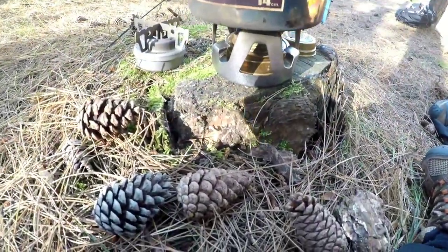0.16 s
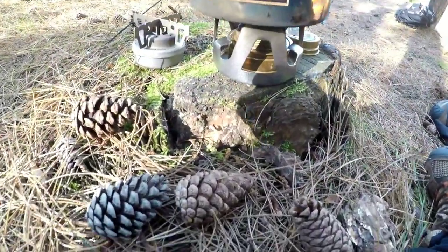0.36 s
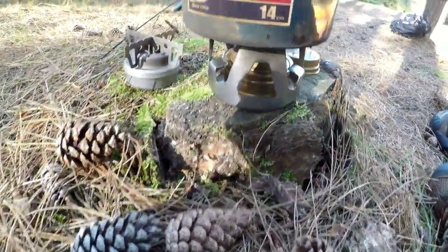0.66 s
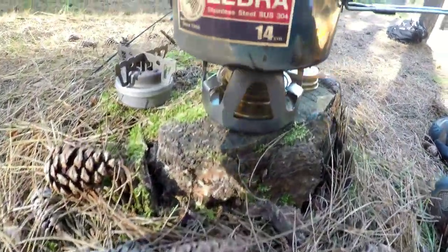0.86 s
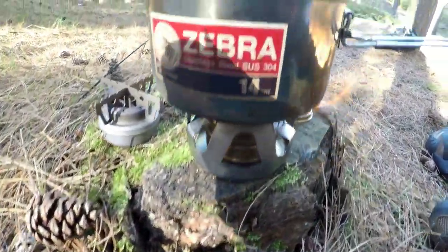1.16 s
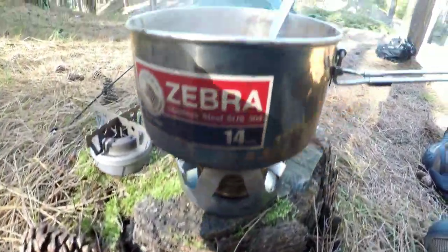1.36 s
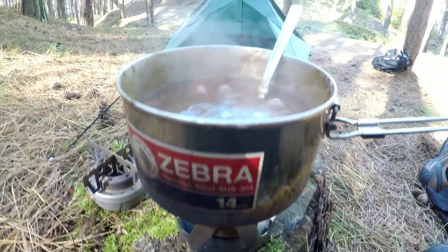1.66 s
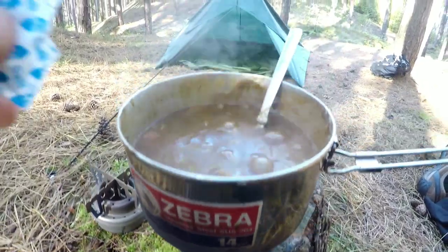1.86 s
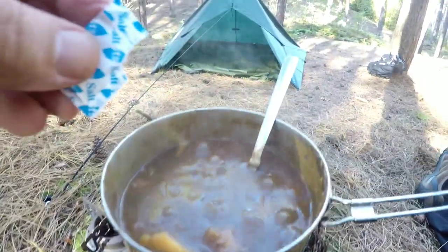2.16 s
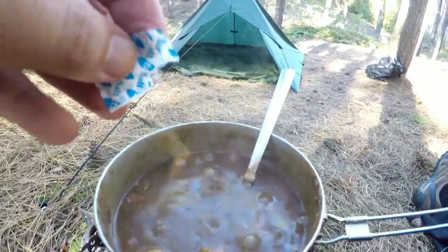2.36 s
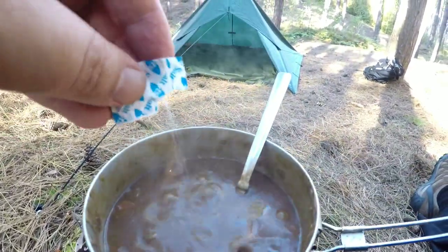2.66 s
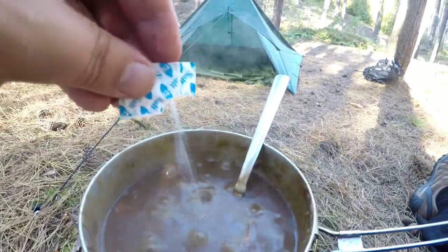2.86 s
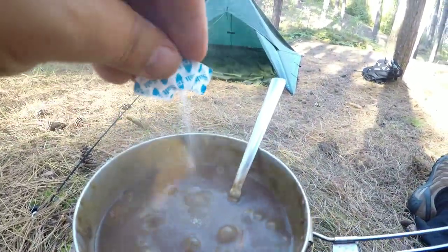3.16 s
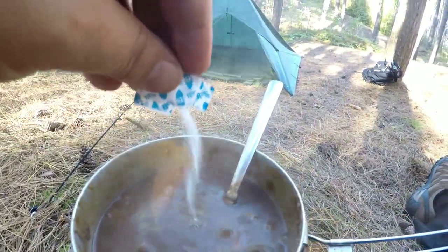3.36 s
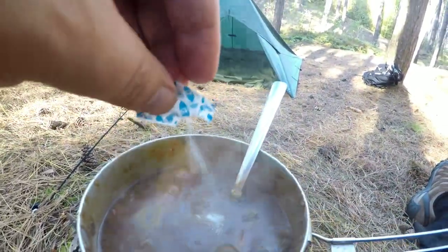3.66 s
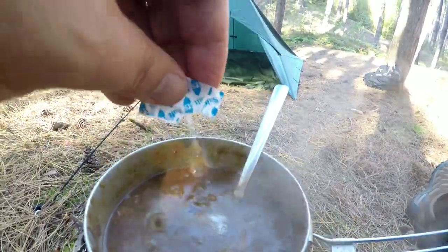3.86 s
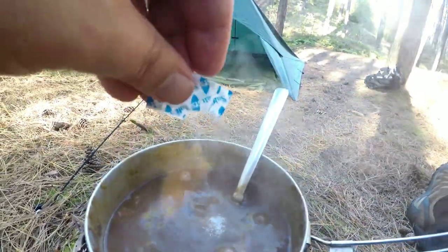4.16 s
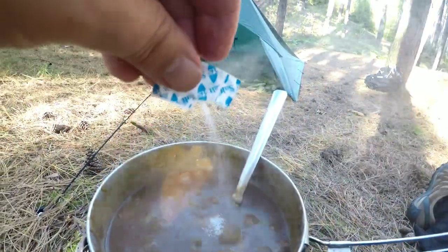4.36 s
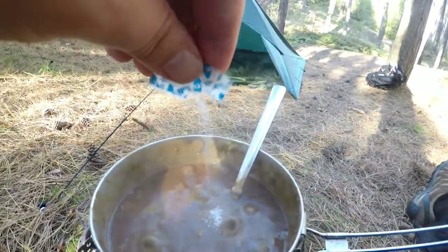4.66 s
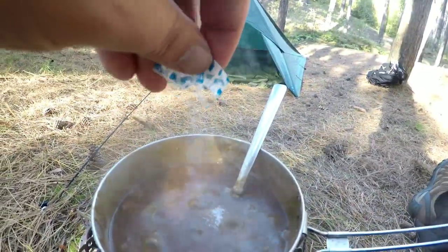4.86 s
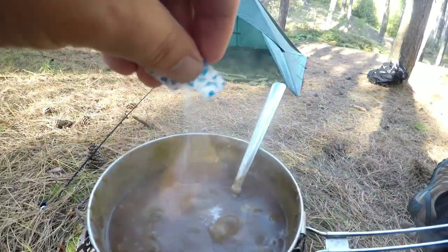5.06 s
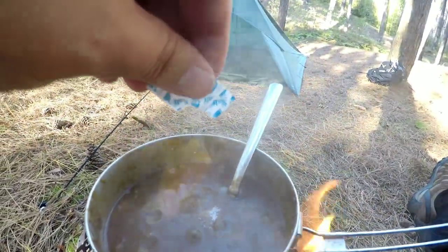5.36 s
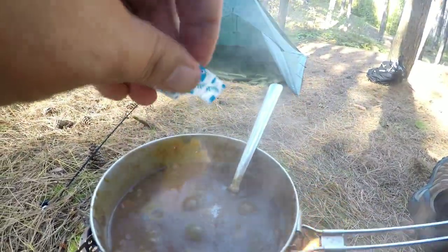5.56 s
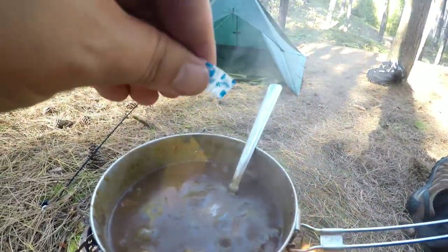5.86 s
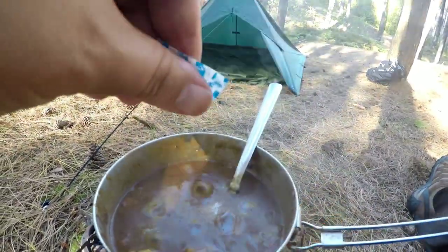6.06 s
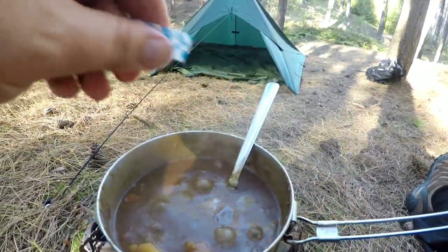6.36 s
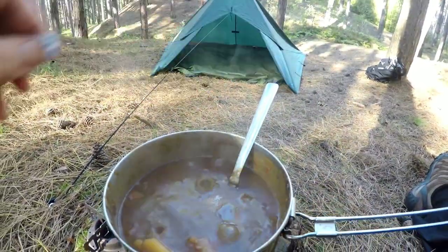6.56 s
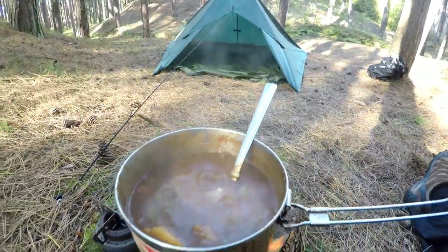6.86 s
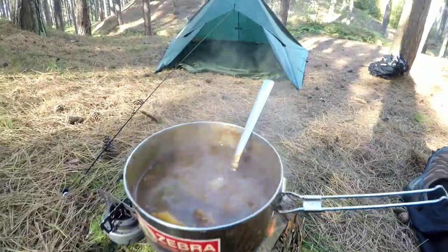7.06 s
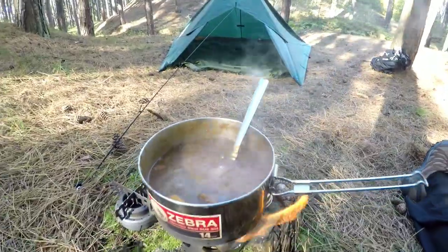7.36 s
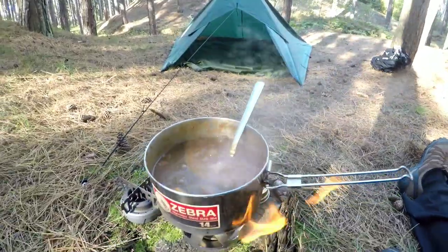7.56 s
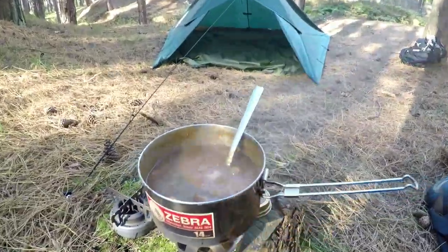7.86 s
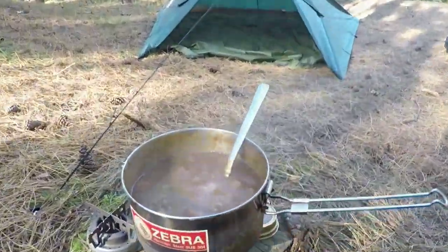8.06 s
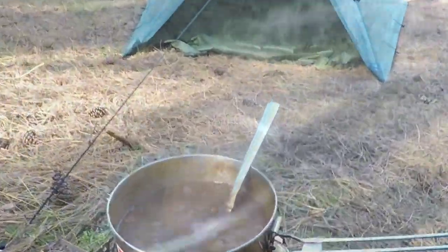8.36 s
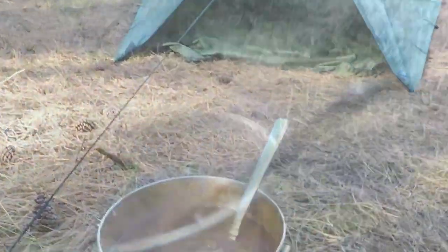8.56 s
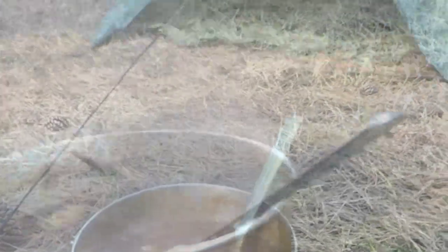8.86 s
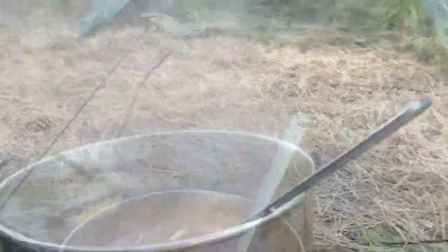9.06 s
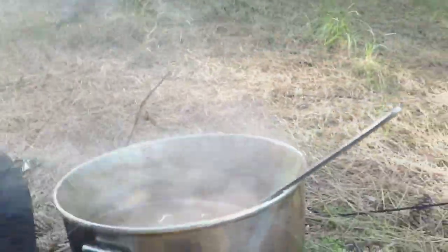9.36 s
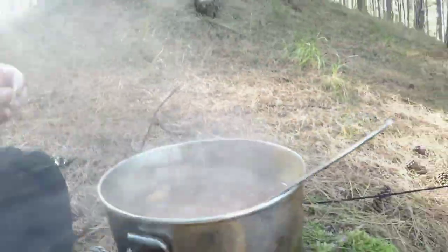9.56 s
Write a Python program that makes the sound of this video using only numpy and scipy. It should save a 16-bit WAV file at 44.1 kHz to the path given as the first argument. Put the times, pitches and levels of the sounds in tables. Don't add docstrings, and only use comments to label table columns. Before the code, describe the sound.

Outdoors, a hand-held microphone moves close to a pot of thick stew. Sparse, distant bubbling grows into dense plops, spits and fizz, while a paper sachet snaps and grains hiss out in several shakes. Low wind buffeting and hand knocks intrude, especially early and past seven seconds. After a tiny silence near the end, a calmer boil fades in and a puff of airy steam drifts past.

```python
import sys
import numpy as np
from scipy import signal
from scipy.fft import rfft, irfft, next_fast_len
from scipy.io import wavfile
from scipy.ndimage import uniform_filter1d, map_coordinates

SR = 44100
rng = np.random.default_rng(int(sys.argv[2]) if len(sys.argv) > 2 else 0)


def elevation(decibels):
    levels = np.asarray(decibels, float)
    return 10 ** (levels / 20)


def wrap_up_sound(samples):
    columns = np.atleast_2d(samples).T
    tamed = np.clip(columns, -1, 1)
    steps = np.round(tamed * 32767).astype(np.int16)
    wavfile.write(sys.argv[1], SR, steps)


N = 428211


def unit(x):
    return x / np.sqrt(np.mean(x ** 2) + 1e-20)


def curves(rows):
    s, *cols = np.transpose(rows)
    return [np.interp(np.arange(N) / SR, s, c) for c in cols]


def swells(rows):
    at, half, *rises = np.transpose(rows)
    coarse_t = np.arange(0, N, 64)[:, None] / SR
    humps = np.exp(-((coarse_t - at) / half) ** 2)
    return [np.repeat(humps @ rise, 64)[:N] for rise in rises]


def wobble(rate):
    knots = rng.standard_normal(int(N * rate / SR) + 4)
    return map_coordinates(knots, [np.arange(N) * rate / SR])


def coloured(x, points):
    m = next_fast_len(N + 8192)
    f, db = np.transpose(points)
    log_hz = np.log(np.fft.rfftfreq(m, 1 / SR) + 1)
    gain = elevation(np.interp(log_hz, np.log(f + 1), db))
    return unit(irfft(rfft(x, m) * gain, m)[:N])


def patchy():
    z = signal.stft(rng.standard_normal(N), nperseg=256)[2]
    across_hz = uniform_filter1d(rng.standard_normal(z.shape), 4, 0)
    field = uniform_filter1d(across_hz, 6, 1)
    return signal.istft(z * elevation(1.2 * unit(field)), nperseg=256)[1][:N]


def blips(s, db, hz, t60, rise, attack, size):
    t = np.arange(size) / SR
    s, db, hz, t60 = (np.asarray(v)[:, None] for v in (s, db, hz, t60))
    phase = 2 * np.pi * hz * t * (1 + rise * t / t60 / 2)
    onset = 1 - np.exp(-t * hz / attack)
    wave = elevation(db - 60 * t / t60) * onset * np.sin(phase)
    at = np.round(s * SR).astype(int) + np.arange(size)
    return np.bincount(at.ravel(), wave.ravel(), N + SR)[:N]


def clusters(s, db, hz, spread, smear, t60, count, size):
    g = rng.standard_normal((len(s), count, 3))
    fan = np.linspace(-1.4, 1.4, count) + .35 * g[..., 0]
    pitch = np.clip(hz[:, None] * np.exp(spread * fan), 500, 14500).ravel()
    level_db = (db[:, None] + 1.6 * g[..., 1] - 3.5 * fan ** 2).ravel()
    level_db = level_db - 4 * np.maximum(pitch / 1000 - 9, 0)
    late = smear * (1 + np.tanh(g[..., 2])) / 2
    return blips((s[:, None] + late).ravel(), level_db, pitch, t60 + 0 * pitch, rise=0.092, attack=1.5, size=size)


# [centre t/s, half length t/s, wind rise level/dB, hand rise level/dB]
GUSTS = [(.13, 0.019, 8, 5.5), (0.33, 0.098, 8, 0), (1.564, 0.0073, 13.5, 12), (1.705, 0.094, 7, 2),
         (2.315, 0.047, 8, 0.5), (2.791, 0.097, 11.5, -1), (3.212, 0.25, 8, -1), (3.455, 0.24, -1.5, 1.5),
         (7.183, 0.11, 12.5, 1.5), (7.41, 0.058, 11.5, 1.5), (7.746, 0.045, 11.5, 0),
         (8.59, 0.078, 10.5, -1.5), (8.667, 0.11, 6, 15)]
# [f/Hz, level/dB per Hz]
BUFFET = [(8, -5), (22, 2), (40, -2.5), (62, -4.5), (85, -23.5), (150, -30.5), (300, -120)]
# [f/Hz, level/dB per Hz]
HANDLING = [(30, -120), (55, -9), (80, 0), (130, -3.5), (220, -13), (310, -23.5), (400, -43), (900, -120)]
# [t/s, peak level/dB, f/Hz, t60 t/s]
KNOCKS = [(1.547, -11, 59.3, 0.092), (2.283, -27, 70, 0.056), (3.215, -6.5, 63.7, 0.074),
          (6.914, -25, 250.3, 0.052), (7.195, -11.5, 42.3, 0.12), (7.212, -21, 292, 0.016),
          (7.242, -25.5, 400, 0.0074), (7.3299, -1.5, 134, 0.014), (2.796, -16, 53.1, 0.15),
          (8.613, -4, 94, 0.12), (8.678, -14, 130, 0.029), (8.6849, -6.5, 199, 0.063)]


def rumble():
    wind_db, hand_db = swells(GUSTS)
    wind = elevation(1.75 * wobble(10)) * coloured(rng.standard_normal(N), BUFFET)
    grip = elevation(1.6 * wobble(25)) * coloured(rng.standard_normal(N), HANDLING)
    buffet = elevation(-31 + wind_db) * unit(wind)
    handling = elevation(-37 + hand_db) * unit(grip)
    s, db, hz, t60 = np.transpose(KNOCKS)
    knocks = blips(s, db + 0.5, hz, np.clip(t60, .01, .15), rise=0, attack=0.18, size=6000)
    return buffet + handling + knocks


# [start t/s, end t/s]
DROPOUT = (8.7995, 8.866)
# [centre t/s, half length t/s, rise level/dB]
STEAM = [
    (9.38, 0.38, 14.5),
]
# [f/Hz, level/dB per Hz]
PUFF = [(3000, -34), (5000, -14.5), (7000, -3.5), (8500, 11), (11000, 1), (13300, -7), (15400, -36)]
# [centre t/s, half length t/s, share of direct sound]
RIM = [
    (9.47, .14, .9),
]


def steam():
    lag_s = .00028
    hiss = coloured(patchy(), PUFF)
    echo = np.interp(np.arange(N) - lag_s * SR, np.arange(N), hiss)
    share = np.clip(swells(RIM)[0], 0, 1)
    later = np.arange(N) / SR > DROPOUT[0]
    return later * elevation(-72.5 + swells(STEAM)[0]) * (hiss + share * echo)


# [t/s, fizz level/dB]
BOIL = [(0.0, -58), (1.15, -55.5), (1.81, -55.5), (1.93, -56), (2.81, -58), (2.94, -54.5), (4.53, -58.5),
        (4.94, -55), (5.29, -60), (5.53, -55), (6.44, -59), (6.88, -58.5), (7.61, -54.5), (8.3, -60.5),
        (8.62, -60.5), (8.79, -58)]
# [centre t/s, half length t/s, rise level/dB]
POURS = [
    (1.9, 0.21, 3),
    (3.1, 0.47, 5.5),
    (4.4, 0.1, 6),
    (5.05, 0.32, 3),
    (5.5, 0.2, 3),
    (5.85, 0.18, 5),
    (6.15, 0.1, 2),
]


def beds():
    boil_db, steam_db = curves(BOIL)[0], swells(STEAM)[0]
    excess_db = boil_db + 58.5
    first = [-50 + 0.27 * excess_db, boil_db - 3.5, -67.5 + 0.53 * excess_db + swells(POURS)[0]]
    later = [-42.5 + 0 * steam_db, -62 + 0.21 * steam_db, -78 + 0 * steam_db]
    return np.where(np.arange(N) / SR > DROPOUT[0], later, first)


def stirred(pops):
    highpass = signal.butter(2, 2000, "highpass", fs=SR, output="sos")
    bright = np.abs(signal.sosfilt(highpass, pops))
    busy = np.abs(uniform_filter1d(uniform_filter1d(bright, size=700), size=700))
    return 20 * np.log10(1 + .5 * busy / np.mean(busy))


def swarm(s, db, hz, spread, cycles, size):
    g = np.clip(rng.standard_normal((len(s), 3)), -2, 2)
    pitch = np.clip(hz * np.exp(spread * g[:, 0]), 100, 15000)
    t60 = cycles * np.exp(.35 * g[:, 2]) / pitch
    return unit(blips(s, db + 3.5 * g[:, 1], pitch, t60, rise=.2, attack=.5, size=size))


def spatter(s, db, width):
    gate = np.bincount(np.round(s * SR).astype(int), elevation(db), N + 1)[:N]
    t = np.arange(400) / SR / width
    return signal.fftconvolve(gate, t * np.exp(-t))[:N] * rng.standard_normal(N)


# [t/s, level/dB of the pops over the beds]
NEAR = [
    (0, -6.5),
    (1.4, -3.5),
    (2, 0.5),
    (6.8, 0),
    (7.4, -6.5),
    (8.8, 0.5),
    (8.9, -3.5),
    (9.71, -7.5),
]
# [centre t/s, half length t/s, rise level/dB]
SCRAPES = [
    (7.45, 0.21, 7),
    (8.76, 0.11, 7.5),
    (8.684, 0.011, 11),
]
# [f/Hz, level/dB per Hz]
SEETHE = [(180, 4.5), (300, 3), (459, -0.5), (954, -7), (1460, -9.5), (1720, -12.5), (2600, -16.5),
          (3380, -44), (5720, -120)]
# [f/Hz, level/dB per Hz]
FIZZ = [(1290, -35), (2200, 7), (2880, 7), (3630, 9.5), (4430, 5.5), (4770, 9), (5190, 6.5), (6330, 10),
        (7200, 2), (9360, -35), (15800, -120)]
# [f/Hz, level/dB per Hz]
RUSTLE = [(3530, -59), (6000, -9), (6480, -26), (7220, -7), (8790, -2.5), (11100, -10), (12700, -16),
          (14300, -17), (15700, -36)]


def simmer(pops):
    seethe_db, fizz_db, rustle_db = beds()
    surge, stir_db = np.tanh(wobble(15)), stirred(pops)
    froth = np.minimum(wobble(32), 1.2)
    density = elevation(2.5 * surge + 6 * froth + .4 * stir_db)
    near = elevation(curves(NEAR)[0])

    u = rng.random((1200, 2))
    s = np.interp(u[:, 0], np.cumsum(density) / np.sum(density), np.arange(N) / SR)
    db = -3.5 * np.log(u[:, 1] + .2)
    apart = .02 * rng.standard_normal(len(s)) * (rng.random(len(s)) < .5)
    low = np.clip(s + apart, 0, N / SR)

    bubbles = 0.55 * swarm(low, db, hz=1050, spread=0.55, cycles=4.5, size=500)
    drops = 0.89 * swarm(s, db, hz=3790, spread=0.11, cycles=29, size=300)
    spray = 0.75 * coloured(spatter(s, db, width=0.0013), FIZZ)
    mist = 0.55 * coloured(spatter(low[::-1], db, width=0.004), RUSTLE)

    seethe = elevation(swells(SCRAPES)[0]) * coloured(patchy(), SEETHE) + near * bubbles
    fizz = coloured(patchy(), FIZZ) + near * (drops + spray)
    rustle = coloured(patchy(), RUSTLE) + near * mist
    return (elevation(seethe_db + 0.43 * surge + 0.36 * stir_db) * seethe
            + elevation(fizz_db + 0.15 * surge + 0.48 * stir_db) * fizz
            + elevation(rustle_db + 0.5 * surge + 0.28 * stir_db) * rustle)


# [t/s, peak level/dB, f/Hz]
SNAPS = [(0.5684, -36, 6690), (1.5278, -37.5, 7180), (1.948, -36, 6790), (2.5868, -36.5, 6870),
         (2.9422, -30.5, 7770), (3.0321, -35, 8440), (3.0398, -34, 7260), (3.0599, -36, 8303),
         (3.09, -28, 8067), (3.256, -32, 8170), (3.6042, -32, 6630), (3.9043, -34.5, 6530),
         (4.385, -33, 8310), (4.7369, -37.5, 7560), (4.94, -31.5, 6847), (5.0405, -34, 8225),
         (5.1714, -36.5, 8175), (5.3865, -37.5, 7610), (5.4801, -34.5, 7060), (5.506, -36.5, 8090),
         (5.809, -36.5, 6680), (5.8159, -33, 8230), (6.0518, -37, 8745), (6.1685, -34, 8450),
         (6.242, -37, 6180), (6.4355, -38.5, 8160), (7.3286, -24.5, 8960), (7.855, -34, 6643),
         (8.2239, -35.5, 7027), (9.687, -39, 6390),
         (0.1678, -43.0, 8460), (0.583, -43.5, 6720), (0.599, -43.5, 8274), (1.1487, -44, 7580),
            (1.3538, -43, 7606), (1.533, -44, 7953), (1.8584, -38.5, 7583), (2.0534, -38.5, 6700),
            (2.1096, -40.5, 6760), (2.1806, -39.5, 8160), (2.956, -36, 7530), (3.4967, -39.5, 8640),
            (3.5813, -39.5, 7280), (3.6338, -39, 8630), (5.86, -42, 8740), (4.559, -39.5, 8500),
            (4.636, -40.0, 6370), (8.142, -43, 6050), (4.7012, -43, 6630), (5.0453, -39, 8370),
            (5.067, -40, 6510), (5.1802, -36, 8810), (5.374, -43, 6627), (5.489, -40, 8250),
            (5.667, -40, 6740), (5.888, -39.5, 7500), (5.898, -40.5, 6865), (6.0416, -34.5, 6660),
            (6.128, -42.0, 6440), (6.141, -42, 8080), (6.179, -39.5, 8430), (6.1972, -43, 6470),
            (6.204, -43, 6516), (6.3398, -43, 8990), (6.3517, -37, 6990), (6.3901, -43.0, 6760),
            (6.5129, -38.5, 6170), (6.092, -42.5, 8500), (8.255, -44.5, 5220), (6.94, -39, 6700),
            (7.0079, -44, 6270), (7.1729, -41, 6125), (7.3173, -39.5, 6734), (7.4009, -39.0, 6790),
            (8.274, -43, 5395), (7.9686, -43.5, 6760), (8.3774, -39.5, 6610), (8.4785, -39.5, 6322),
            (8.6869, -36, 7360), (8.7157, -42.0, 6420)]


def snaps():
    s, db, hz = np.transpose(SNAPS)
    return clusters(s - .0003, db + 2.5, .96 * hz, spread=.25, smear=.0014, t60=.0035, count=8, size=250)


# [t/s, peak level/dB, f/Hz]
SPITS = [(0.8271, -39, 4490), (1.8466, -38, 4186), (1.8945, -34, 3666), (1.9688, -37.5, 3887),
         (2.185, -36.5, 4150), (2.3345, -35.5, 3930), (2.415, -33, 3986), (2.4939, -36, 3820),
         (2.5536, -36, 4620), (2.5767, -32.5, 4573), (2.587, -31.5, 4140), (2.6762, -34.5, 3895),
         (2.7166, -35.5, 3455), (2.762, -34.5, 4020), (2.7955, -36.5, 4040), (2.819, -38, 3482),
         (2.9473, -34, 4020), (2.9774, -36, 3457), (3.0707, -34, 4180), (3.0889, -27.5, 3830),
         (3.1125, -26.5, 2800), (3.289, -38.5, 3575), (3.3094, -36, 4380), (3.3179, -34, 4144),
         (3.492, -34, 3640), (3.524, -37, 4893), (3.6049, -29, 4627), (3.9166, -34.5, 4516),
         (3.9681, -34.5, 4160), (4.005, -31.5, 3940),
         (4.2756, -37.5, 3996), (4.68, -37, 4920), (4.7364, -34.5, 3780), (4.939, -36, 4110),
              (5.1844, -36, 3975), (5.2551, -35.5, 2670), (5.2721, -30.5, 5487), (5.489, -34, 4350),
              (5.6682, -36, 4440), (5.776, -37, 4790), (5.8978, -36.5, 4305), (6.0427, -34.5, 4435),
              (6.625, -28.5, 5380), (6.799, -37, 4020), (7.0859, -37.5, 4475), (7.1657, -39.5, 2917),
              (7.2275, -35.5, 4468), (7.2613, -31, 3718), (7.3289, -34, 4090), (7.4638, -39, 3890),
              (8.222, -40, 3905), (8.6872, -36, 3736), (9.0483, -38.5, 3395), (9.1809, -40.5, 4388),
              (9.33, -40, 3065), (9.4265, -39, 4130), (9.476, -41, 3833), (9.5093, -40, 4387),
              (9.5775, -41.5, 3260), (9.5853, -42.5, 4220),
         (0.4722, -40, 1918), (0.881, -38.5, 2324), (1.089, -42, 2884), (2.0014, -42.0, 4157),
         (2.1055, -36.5, 3736), (2.1523, -41.0, 3924), (0.795, -41.5, 3620), (2.1988, -41.0, 4110),
         (2.244, -40.5, 3618), (6.287, -42, 4640), (2.315, -42.5, 3706), (2.3246, -41.5, 3787),
         (2.46, -39.5, 3848), (2.502, -40, 3515), (2.6567, -41, 4080), (2.7018, -39.5, 4800),
         (2.7712, -38.5, 4553), (2.885, -39.5, 4335), (2.9922, -38.0, 3612), (3.1448, -33.5, 3769),
         (3.192, -39.5, 3385), (3.256, -39, 3945), (3.2987, -40.5, 4165), (3.3395, -39.5, 4180),
         (3.403, -40.5, 4245), (3.5426, -41.5, 3630), (3.5817, -33.5, 3440), (3.636, -38.0, 3840),
         (3.7322, -35, 3670), (3.773, -40.5, 4060), (3.7956, -40, 4270), (3.865, -39.5, 4150),
         (3.8975, -39.5, 4095), (3.9031, -39.5, 5240), (5.7695, -40, 5207), (2.8382, -40, 3877),
         (3.9773, -39.0, 3447), (4.0193, -39.0, 3790), (2.868, -40, 3500), (4.1564, -38.0, 4210),
         (4.1856, -42, 4030), (3.43, -40.5, 3450), (4.3849, -37, 4830), (4.4048, -39.5, 4677),
         (4.5586, -42, 5040), (4.5731, -42, 3880), (4.7008, -39.5, 4075), (4.7208, -39, 2690),
              (4.8375, -39.0, 3877), (4.8746, -41, 3890), (4.8929, -40.5, 4837), (5.1774, -40, 3953),
              (6.001, -40, 4197), (5.3874, -36.5, 4890), (5.4965, -38.5, 4883), (5.5024, -37, 5136),
              (5.5149, -42.5, 3723), (5.7196, -39.5, 3775), (6.0508, -37.5, 3710), (6.1257, -39.0, 5196),
              (5.268, -35.5, 3660), (6.268, -40, 5010), (6.2411, -39, 5420), (6.3144, -37, 3988),
              (6.3515, -37.5, 5160), (6.4112, -38, 3465), (6.4343, -41.0, 3713), (6.5131, -36.5, 5578),
              (6.5653, -42.0, 4130), (6.6372, -40.5, 4140), (6.7043, -40.5, 2660), (9.354, -42, 4594),
              (9.001, -42, 3954), (9.293, -43, 4390), (7.0076, -40, 5277), (8.087, -42, 3790),
              (7.1724, -41.5, 5760), (7.318, -39, 3400), (7.909, -42, 4520), (7.5321, -37.5, 3958),
              (7.856, -36.5, 5260), (7.9683, -43.0, 5015), (8.4788, -37.5, 4985), (8.6632, -40.5, 3820),
              (8.6779, -41.0, 3006), (8.041, -41, 4812), (8.7169, -37.0, 2857), (9.1573, -43.0, 3060)]


def spits():
    s, db, hz = np.transpose(SPITS)
    return clusters(s - .0004, db + 6.0, hz, spread=.11, smear=.002, t60=0.0049, count=4, size=400)


# [t/s, peak level/dB, f/Hz]
PLOPS = [(1.5373, -27.5, 1109), (2.183, -35, 1820), (2.2216, -30, 871), (2.6218, -29.5, 914),
         (2.7575, -29.5, 948), (2.8567, -22.5, 1020), (2.8633, -31, 1062), (2.9201, -29.5, 868),
         (2.9561, -30.5, 926), (3.0374, -28, 1090), (3.174, -34.0, 826), (3.3302, -25.5, 1164),
         (3.3744, -33.5, 1390), (3.5229, -26, 753), (3.5603, -34, 980), (3.6046, -29, 1701),
         (3.6561, -33.5, 823), (3.673, -30.5, 1163), (3.8766, -28, 953), (4.0466, -32.5, 1052),
         (4.3971, -34, 1670), (4.4875, -24.5, 813), (5.6496, -33.5, 910), (5.8788, -29.5, 1515),
         (5.9896, -31.5, 1158), (6.0176, -31.5, 950), (6.4393, -26.5, 1390), (6.5524, -36, 1046),
         (6.902, -32.5, 1318), (7.0776, -28, 1043), (7.165, -30.0, 1462), (7.3182, -26.5, 985),
         (8.6864, -29.5, 803)]
# [t/s, peak level/dB, f/Hz]
SPLATS = [(1.516, -32, 1020), (1.7952, -33.5, 943), (2.2464, -31, 714), (2.296, -21.5, 1084),
          (2.7377, -28, 932), (3.09, -25.5, 1720), (3.097, -37.5, 990), (3.1114, -21, 1710),
          (3.1118, -25, 2650), (3.6421, -34.5, 970), (3.8656, -33.5, 910), (4.13, -33.5, 965),
          (4.1428, -32.5, 1034), (4.1913, -27, 1173), (4.3286, -27.0, 1033), (4.4193, -28.5, 840),
          (4.5395, -33, 710), (4.659, -32.5, 984), (4.9623, -30.5, 885), (5.0951, -33.5, 1353),
          (5.1073, -22.0, 1466), (5.2535, -21.5, 1610), (5.2693, -22, 1873), (5.7218, -33, 880),
          (5.886, -22.5, 1406), (6.2415, -34, 815), (6.6245, -27, 1296), (6.704, -33.5, 1390),
          (7.2444, -31, 920), (7.3289, -23.5, 859), (7.475, -34.5, 880), (7.6473, -29.0, 1410),
          (8.605, -33.5, 1325), (8.6772, -26.5, 823)]
# [t/s, peak level/dB, f/Hz]
BLUBS = [(0.0601, -38.5, 1475), (0.29, -40.5, 1043), (0.4853, -39.5, 1257), (0.7403, -33.5, 1277),
         (0.795, -36.5, 1270), (1.2726, -38.5, 1198), (1.28, -37, 1397), (1.715, -38.0, 704),
         (1.756, -37.5, 1280), (1.8076, -37, 940), (1.8368, -36.5, 1440), (1.9728, -39.5, 810),
         (2.058, -36, 806), (2.2403, -37.0, 940), (2.476, -35, 885), (2.543, -36.5, 917),
         (2.5997, -35.5, 1320), (3.1989, -36, 1530), (3.9938, -38.5, 1114), (4.0563, -38.5, 1302),
         (4.2038, -35.0, 900), (0.692, -41, 1800), (0.7951, -37, 2000), (0.915, -41, 1880),
         (1.411, -39, 1990), (4.2559, -34, 993), (4.2742, -37.0, 1470), (4.3605, -36, 695),
         (4.4826, -37.0, 700), (4.6215, -36, 964), (4.6764, -36, 1230), (4.7207, -36, 962),
         (4.7361, -36, 1575), (4.8304, -36, 936), (4.9018, -39, 710)]
# [t/s, peak level/dB, f/Hz]
BLUPS = [(4.98, -36, 1380), (5.3742, -37.5, 1410), (5.3838, -37, 852), (5.421, -35.0, 902),
         (5.4902, -34.5, 657), (5.5266, -36, 1005), (5.552, -35.0, 772), (5.6303, -34.5, 1113),
         (5.8689, -35.0, 1110), (5.9146, -36.5, 872), (6.0512, -34.5, 1296), (6.1227, -36.5, 874),
         (6.2091, -35, 1030), (6.2225, -36, 1150), (6.2291, -32, 1040), (6.3144, -38.5, 782),
         (6.3513, -37.5, 1410), (7.307, -35, 1700), (6.536, -40, 897), (6.5767, -36, 1158),
         (6.8189, -38.5, 922), (7.0402, -38, 1003), (7.2159, -38, 710), (7.243, -35, 1960),
         (7.8082, -39.5, 895), (7.84, -36.5, 1250), (7.8552, -36, 1216), (8.578, -37, 1190),
         (8.4739, -34.5, 1165), (8.7165, -32.5, 1893), (8.9227, -36.5, 1012), (9.1149, -38, 1330),
         (9.4815, -37.5, 1075)]


def bursts():
    s, db, hz = np.transpose(PLOPS + SPLATS + BLUBS + BLUPS)
    cycles = np.repeat([14, 7, 8], [len(PLOPS), len(SPLATS), len(BLUBS + BLUPS)])
    ring = blips(s, db + 45 / cycles - .7, hz, cycles / hz, rise=.15, attack=.35, size=1000)
    suction = blips(s + .4 / hz, db + 5 - cycles / 2, .6 * hz, 3 / hz, rise=0, attack=.1, size=300)
    tearing_skin = blips(s, db - 6.5, 1.7 * hz, .003 + 0 * s, rise=.3, attack=.5, size=200)
    return ring - suction + tearing_skin


def scene():
    pops = bursts() + spits() + snaps()
    return (pops + simmer(pops) + rumble() + steam())[None]


def top_cut(x):
    return signal.sosfilt(signal.butter(12, 15820, fs=SR, output="sos"), x)


def record(dry):
    t = np.arange(N) / SR
    start, end = DROPOUT
    fade = elevation(np.interp(t, (end, end + 0.72), (-5, 0)))
    mix = dry * np.where(t < start, 1, fade * (t > end))
    return top_cut(mix)


dry = scene()
out = record(dry)
wrap_up_sound(out)
```